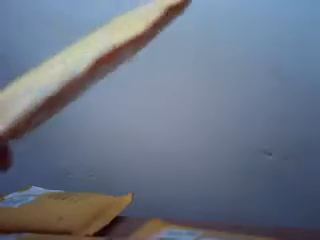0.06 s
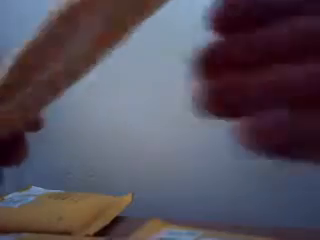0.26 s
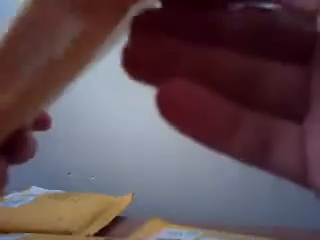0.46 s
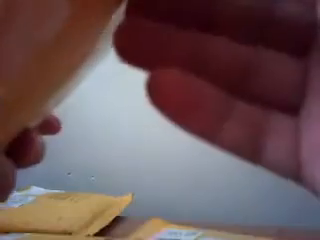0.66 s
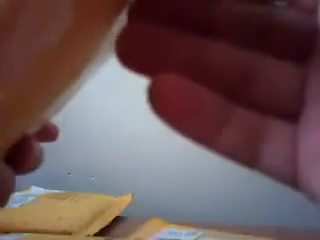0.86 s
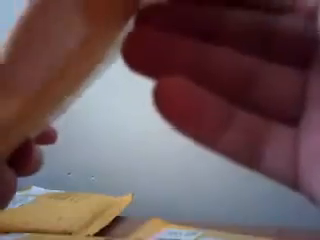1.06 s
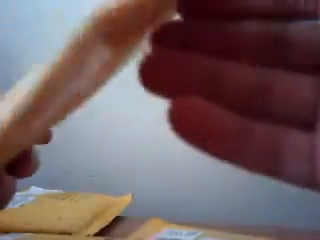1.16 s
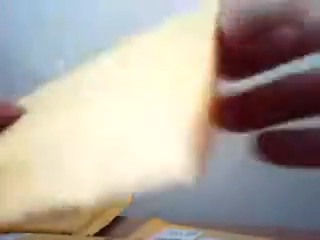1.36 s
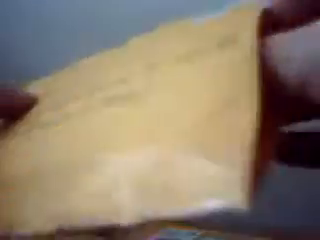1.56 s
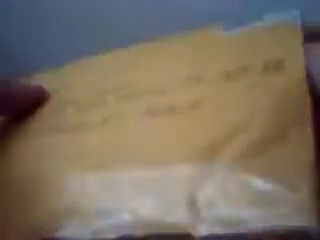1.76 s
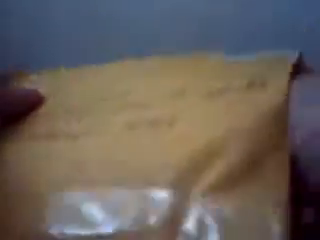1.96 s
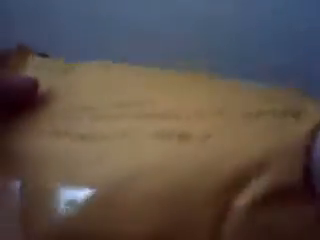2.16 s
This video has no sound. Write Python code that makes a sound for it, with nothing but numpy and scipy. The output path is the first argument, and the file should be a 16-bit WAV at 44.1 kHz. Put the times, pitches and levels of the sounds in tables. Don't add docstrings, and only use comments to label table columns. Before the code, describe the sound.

Stiff paper rips abruptly with a dull padded thump and short room echo, light ticks follow during handling, then dense crisp crinkles and finger rustle build, over faint hiss and a briefly fading motor drone.

```python
import sys
import numpy as np
from scipy import signal
from scipy.fft import rfft, irfft
from scipy.io import wavfile

SR = 44100
rng = np.random.default_rng(int(sys.argv[2]) if len(sys.argv) > 2 else 0)


def output_pcm(signal):
    pcm = np.clip(np.atleast_2d(signal).T, -1, 1) * 32767
    wavfile.write(sys.argv[1], SR, np.round(pcm).astype(np.int16))


def volts(x):
    e = np.asarray(x, float) / 20
    return 10 ** e


N = 97020
LAG_S = 0.0006
CRUMBLE = 0.22


def evened(x):
    return x / np.sqrt(np.mean(x ** 2) + 1e-20)


def read(points, hz):
    f, value = np.transpose(points)
    return np.interp(np.log(hz + 1), np.log(f + 1), value)


def add(mix, s, sound):
    part = mix[round(s * SR):][:len(sound)]
    part += sound[:len(part)]


def coloured(x, spectrum):
    gain = volts(read(spectrum, np.fft.rfftfreq(len(x), 1 / SR)))
    return irfft(rfft(x) * gain, len(x))


def slow(hz):
    lowpass = 1 / (1 + (np.fft.rfftfreq(N, 1 / SR) / hz) ** 2)
    return evened(irfft(rfft(rng.standard_normal(N)) * lowpass, N))


def rings(x, table, shift):
    out = np.zeros(len(x))
    for k, (hz, width_hz, db) in enumerate(table):
        r = np.exp(-np.pi * width_hz / SR)
        poles = [1, -2 * r * np.cos(2 * np.pi * hz * shift[k] / SR), r * r]
        out += (-1) ** k * volts(db) * (1 - r) * signal.lfilter([1, 0, -1], poles, x)
    return out


def hush():
    # pitch_hz, level_db per Hz
    hiss_colour = [(15, -16), (30, -11), (200, -8), (600, -14.5), (1500, -15.5), (1900, -13.5),
                   (3000, -15.5), (5200, -15.5)]
    # pitch_hz, width_hz, level_db
    murmurs = [(54, 4.9, -75.5), (130, 39, -72.5), (311, 28, -74)]
    t = np.arange(N) / SR
    out = volts(-56.5 + 1.44 * slow(22)) * evened(coloured(rng.standard_normal(N), hiss_colour))
    for hz, width_hz, db in murmurs:
        sine = slow(width_hz / 2) * np.sin(2 * np.pi * hz * t)
        cosine = slow(width_hz / 2) * np.cos(2 * np.pi * hz * t)
        out += volts(db) * (sine + cosine)
    return out


def drone():
    # start_s, pitch_hz, level_db
    glide = [(0, 173.5, -57.5), (0.199, 175.8, -54.5), (.27, 179.8, -58), (.45, 181.3, -57.5),
             (0.601, 181.8, -62.5), (0.851, 189.8, -66), (1.0, 188.3, -74.5)]
    t = np.arange(N) / SR
    s, hz, db = np.transpose(glide)
    turns = np.cumsum(np.interp(t, s, hz) + 0.3 * slow(6)) / SR
    level = volts(np.interp(t, s, db) + 0.8 * slow(6))
    return np.sqrt(2) * level * np.sin(2 * np.pi * turns)


def rustle():
    # pitch_hz, level_db per Hz
    paper = [(150, -40.5), (500, -12), (1000, -15.5), (2000, -2), (3100, -4), (4200, -0.5), (5200, 3.2),
             (6300, -3)]
    # start_s, length_s, level_db, share of length spent rising, tilt to the body_db
    strokes = [(-.02, 0.31, -51, 0.78, -1), (0.191, .12, -33.5, 0.55, 10.5), (.61, 0.091, -50, 0.54, -2.5),
               (0.732, 0.088, -64, 0.54, 10), (.93, 0.13, -58.5, 0.25, 4), (1.14, 0.077, -66, 0.29, -2),
               (1.317, 0.18, -52.5, 0.19, -0.5), (1.462, 0.12, -41, 0.45, 1), (1.572, .13, -39, 0.38, 1),
               (1.692, .08, -39, 0.43, -3), (1.758, 0.17, -36, 0.16, -4.5), (1.963, 0.033, -47, .5, 18),
               (1.981, 0.14, -41.5, 0.49, -4.5), (2.067, 0.29, -32, 0.45, -5)]
    grains_per_s, grain_db, slide_db, split_hz = 3200, -1.5, -2, 3600
    clump = volts(2.8 * slow(100))
    size = volts(2.3 * np.minimum(rng.exponential(1, N), 4))
    size = size * (rng.random(N) < grains_per_s * clump / SR)
    kind = rng.integers(0, 16, N)
    t = np.arange(300) / SR
    grains = np.zeros(N)
    for k, hz in enumerate(np.geomspace(700, 6200, 16)):
        tone = np.sin(2 * np.pi * hz * t) * np.exp(-t * hz / 2.5)
        grit = 0.75 * rng.standard_normal(300) * np.exp(-t / 0.00064)
        grain = evened(tone + grit) * np.sqrt(hz)
        grains += signal.oaconvolve(size * (kind == k), grain)[:N]
    grains = coloured(grains, [(hz, 0.9 * db) for hz, db in paper])
    slide = coloured(rng.standard_normal(N), paper) * clump
    both = volts(grain_db) * evened(grains) + volts(slide_db) * evened(slide)
    body = signal.sosfiltfilt(signal.butter(2, split_hz, fs=SR, output="sos"), both)
    edge = both - body
    out = np.zeros(N)
    for start, length, db, rise, tilt_db in strokes:
        moments = [start, start + rise * length, start + length]
        progress = np.interp(np.arange(N) / SR, moments, [0, 0.5, 1])
        swell = np.sin(np.pi * progress) ** 1.15
        out += volts(db) * swell * (volts(tilt_db) * body + edge)
    return out


def snap(peak_db, body_db, crumble_s, edge_rings, body_rings):
    drive = CRUMBLE * rng.standard_normal(1200) * np.exp(-np.arange(1200) / SR / crumble_s)
    drive[0] = rng.choice([-1, 1])
    shift = 1 + 0.032 * np.tanh(rng.standard_normal(10))
    edge = evened(rings(drive, edge_rings, shift))
    body = evened(rings(drive, body_rings, shift[5:]))
    sound = edge + volts(body_db + 9) * body
    return volts(peak_db) * sound / abs(sound).max()


def snaps(tables, edge_rings, body_rings):
    out = np.zeros(N)
    for table in tables:
        for s, peak_db, body_db, *crumble_s in table:
            crumble = sum(crumble_s) or 0.0011
            add(out, s + LAG_S, snap(peak_db, body_db, crumble, edge_rings, body_rings))
    return out


def ripping():
    # start_s, peak_db, body_db, crumble_s
    tears = [(0.082, -54.5, -22.5, 0.0015), (0.0919, -39.5, -15.5, 0.0015), (0.1116, -43.5, -10, 0.0015),
             (0.1244, -31.5, -21.5, 0.0015), (0.1471, -36.5, -13, 0.0015), (0.1621, -25, -27, 0.0015),
             (0.177, -21, -24, 0.0015), (0.1924, -33, -11, 0.0015), (0.1985, -23, -4, 0.0015),
             (0.2089, 2, -19, 0.0015), (0.2516, -7, -12, 0.001), (0.2679, -6.5, -9, 0.0015),
             (0.2786, -17, 3.5, 0.0015)]
    # start_s, peak_db, body_db, crumble_s
    shudder = [(0.1983, -25, -11.5, .001), (0.2029, -19, -9, .001), (.2101, 1, -15, 0.001),
               (0.2111, 0, -17, 0.0012), (.2135, -5, -13, .002), (0.2165, -5, -11, .002),
               (0.2212, -8.5, -17.5, .002), (0.2262, -13, -17, .003), (0.2362, -13, -14, .002),
               (.2545, -10.5, -4.5, .003)]
    # pitch_hz, width_hz, level_db
    edge_modes = [(3496, 1210, -6.5), (4160, 348, 6.5), (5197, 596, 1.05), (6290, 1090, -11.5)]
    # pitch_hz, width_hz, level_db
    body_modes = [(393.6, 300, -21), (900, 450, -10), (1355, 320, -6), (1900, 280, 1.5), (2565, 600, -8.5)]
    return snaps([tears, shudder], edge_modes, body_modes)


def pushes():
    push_s = [.2085, .251, 1.615, 1.158, 2.115, 1.9478, 2.175, .253, .2095, 1.602]
    # level_db, pitch_hz, t60_s
    knocks = [(-28.5, 98, 0.025), (-36, 140, 0.035), (-47, 110, .13), (-61.5, 216, 0.064),
              (-55.5, 128, .08), (-26, 620, 0.014), (-39, 850, 0.03), (-35.5, 292, 0.083), (-30, 250, .05),
              (-38, 420, .05)]
    out = np.zeros(N)
    t = np.arange(8000) / SR
    for s, (db, hz, t60) in zip(push_s, knocks):
        spread = min(hz / 1200, 0.4)
        knock = sum(np.sin(2 * np.pi * hz * (1 + k * spread) * t) for k in (-1, 0, 0.6)) / 2
        attack = np.minimum(t * 600, 1)
        add(out, s, volts(db - 60 * t / t60) * attack * knock)
    return out


def pops():
    # start_s, peak_db, crumble_s
    creases = [
        (.2512, -1.5, .0011),
        (1.6012, -10.5, .0012),
        (1.9474, -7.5, .0015),
        (2.1742, -22.5, .005),
    ]
    # pitch_hz, width_hz, level_db
    patches = [
        [(1890, 260, 1.5), (3320, 350, -3), (5370, 550, -2.5)],
        [(877, 370, -11), (2100, 300, -5), (2870, 350, -9), (4290, 450, 0), (5420, 350, -3)],
        [(880, 320, -6), (1400, 260, -4), (2400, 700, 0), (4190, 770, -5), (5080, 330, -4), (5980, 340, -1.5)],
        [(900, 200, -3), (1910, 240, 0), (2820, 250, -3), (3360, 250, -2)],
    ]
    out = np.zeros((len(creases), N))
    t = np.arange(2000) / SR
    for track, (s, peak_db, crumble_s), patch in zip(out, creases, patches):
        drive = 0.35 * rng.standard_normal(2000) * np.exp(-t / crumble_s)
        drive[0] = -1
        sound = rings(drive, patch, np.ones(len(patch)))
        add(track, s + LAG_S, volts(peak_db) * sound / abs(sound).max())
    return out


def handling():
    # start_s, peak_db, body_db
    ticks = [(0.4938, -33, -2), (0.5452, -46, -8), (0.625, -38, -17), (0.6678, -33, -15.5),
             (0.7422, -44.5, -23), (0.7504, -61, -17), (0.7544, -41.5, -13), (0.7731, -21.5, -25.5),
             (0.8031, -38.5, -30), (0.8664, -39.5, -13.5), (0.9018, -31, -19), (0.9554, -36.5, -31),
             (0.9657, -25.5, -25.5), (0.9844, -35.5, -30), (1.0031, -31, -7), (1.0271, -34.5, -21),
             (1.1553, -30, -10), (1.1624, -36.5, -11), (1.1847, -32, -14), (1.2099, -28.5, -22.5),
             (1.2286, -51, -7), (1.2489, -30, -23.5), (1.3239, -40.5, -34), (1.3423, -27.5, -24)]
    # start_s, peak_db, body_db, sometimes crumble_s
    crinkles = [(1.504, -26, -36), (1.5200, -29, -9), (1.5783, -30, -20), (1.5965, -33, -20),
                (1.6144, -14, -15, .003), (1.6188, -19, -15, .003), (1.6245, -19, -8, .003),
                (1.6534, -23, -8), (1.6632, -28, -40), (1.7055, -37, -27), (1.723, -25.5, -26),
                (1.7325, -21, -26), (1.7400, -26, -15), (1.7684, -29, -20), (1.7935, -19, -15),
                (1.8144, -26, -28), (1.8452, -28, -22), (1.8871, -25, -27.5), (1.9565, -30, -2),
                (1.9749, -20, -13), (1.9798, -21, -10), (2.0208, -31.5, -31), (2.0428, -29, -29),
                (2.0617, -30.5, -26.5), (2.0785, -23, -22), (2.1228, -26, -15), (2.1638, -23, -25),
                (2.1775, -24, -10), (2.1824, -22, -12), (2.1972, -21, -29)]
    # start_s, peak_db, body_db
    small_ticks = [(.704, -42, -13), (.949, -44, 0), (0.9731, -36.5, -31), (1.106, -59, -26),
                   (1.2286, -42, -6), (1.337, -38, -26), (1.349, -42, -19)]
    # pitch_hz, width_hz, level_db
    edge_modes = [(3665, 800, -8), (4390, 600, -1.5), (5090, 560, 1.5), (5700, 700, -2)]
    # pitch_hz, width_hz, level_db
    body_modes = [(327, 410, -17.5), (787, 390, -7.5), (1462, 400, -6.5), (1966, 340, 1.6), (2633, 710, -5)]
    return snaps([ticks, crinkles, small_ticks], edge_modes, body_modes)


def crackles():
    # start_s, peak_db, pitch_hz
    fibres = [(0.5461, -43, 5300), (0.5568, -48, 5080), (0.5803, -50, 1890), (0.6346, -46, 4610),
              (0.6451, -46, 5430), (0.6494, -41, 5080), (0.6529, -42, 3880), (0.657, -40, 5300),
              (0.6602, -45, 5170), (0.6641, -44, 5080), (0.68, -46, 4610), (1.3759, -44, 5300),
              (1.4016, -47, 4690), (1.4048, -47, 4820), (1.4289, -48, 4780), (1.437, -49, 2450),
              (1.5448, -36, 4650), (1.6408, -30, 4690), (1.6467, -33, 5600), (1.6582, -32, 5380),
              (1.7178, -34, 5300), (1.7475, -31, 5300), (1.7625, -33, 5680), (1.778, -32, 5300),
              (1.7864, -25, 4870), (1.8023, -30, 4220), (1.8083, -26, 5210), (1.8307, -33, 5080),
              (1.8578, -32, 5510), (1.8651, -36, 5170), (2.0357, -33, 4910), (2.0663, -31, 5300),
              (2.0984, -32, 5680), (2.113, -28, 5340), (2.1174, -28, 5640), (2.1205, -28, 5040),
              (2.1293, -27, 4870), (2.1346, -29, 5300), (2.1381, -28, 4090), (2.1478, -28, 5770),
              (2.151, -24, 5210), (2.1597, -28, 4520), (2.1674, -24, 5640), (2.1889, -31, 5470)]
    out = np.zeros(N)
    t = np.arange(300) / SR
    for s, peak_db, hz in fibres:
        drive = CRUMBLE * rng.standard_normal(300) * np.exp(-t / 0.0006)
        drive[0] = rng.choice([-1, 1])
        sound = rings(drive, [(hz, 1000, 0)], [1])
        add(out, s, volts(peak_db + 4) * sound / abs(sound).max())
    return out


def room(x):
    # pitch_hz, t60_s
    decay = [(300, 0.61), (1200, 0.27), (1850, 0.44), (2700, 0.22), (4000, 0.33), (5600, 0.21)]
    gap_s, late_db, late_stretch = 0.003, -19, 2.3
    hz, t, z = signal.stft(rng.standard_normal((3, SR // 2)), SR, nperseg=128)
    fall_db = -60 * t / read(decay, hz)[:, None]
    fall = volts(fall_db) + volts(late_db + fall_db / late_stretch)
    tails = signal.istft(z * fall, SR, nperseg=128)[1]
    tails = np.pad(tails / np.linalg.norm(tails[0]), ((0, 0), (round(gap_s * SR), 0)))
    phase = 7 * np.arange(N) / SR + np.arange(3)[:, None] / 3
    turn = np.cos(2 * np.pi * phase) * np.sqrt(2 / 3)
    return signal.fftconvolve(x * turn, tails, axes=1)[:, :N].sum(0)


def scene():
    rip_pop, *near_pops = pops()
    rip = ripping() + rip_pop
    near = handling() + rustle() + sum(near_pops) + crackles()
    wet = room(volts(-15) * rip + volts(-22) * near)
    return (rip + near + wet + pushes() + drone() + hush())[None]


def roll_off(x):
    return signal.sosfilt(signal.butter(12, 16460, fs=SR, output="sos"), x)


def record(dry):
    edge_hz, ceiling = 6250, 0.74
    band_limit = signal.firwin(601, edge_hz, window=("kaiser", 11), fs=SR)
    narrow = signal.oaconvolve(dry, band_limit[None], "same")
    clipped = np.clip(narrow, -ceiling, ceiling)
    softened = signal.sosfilt(signal.butter(2, 11500, fs=SR, output="sos"), clipped)
    return roll_off(softened)


dry = scene()
out = record(dry)
output_pcm(out)
```